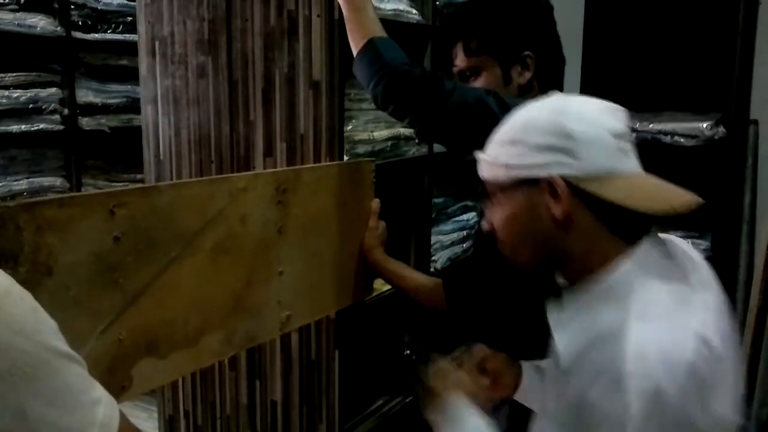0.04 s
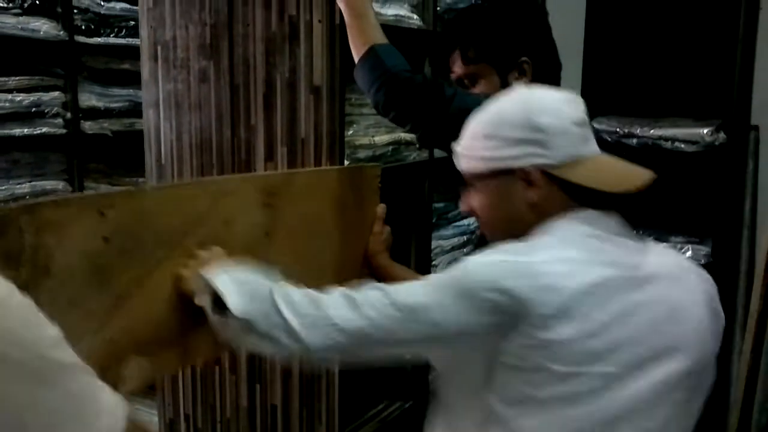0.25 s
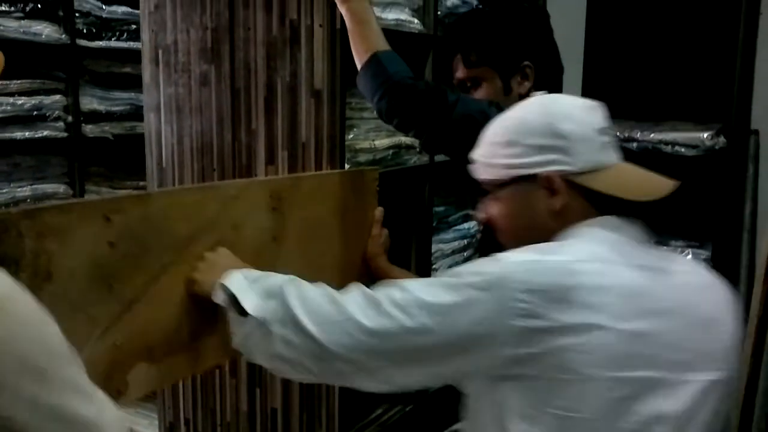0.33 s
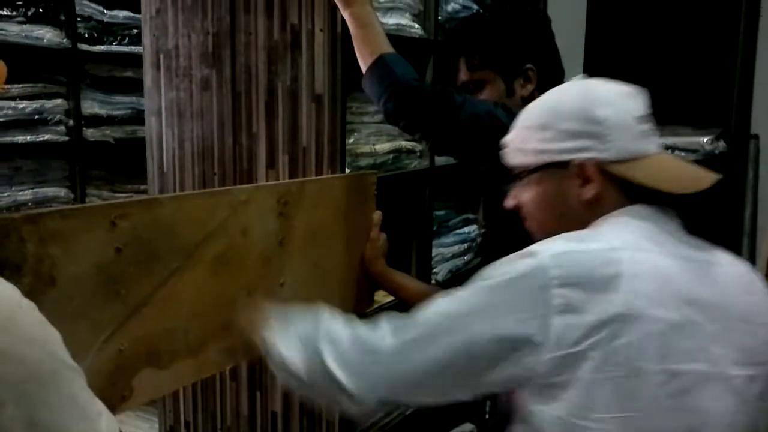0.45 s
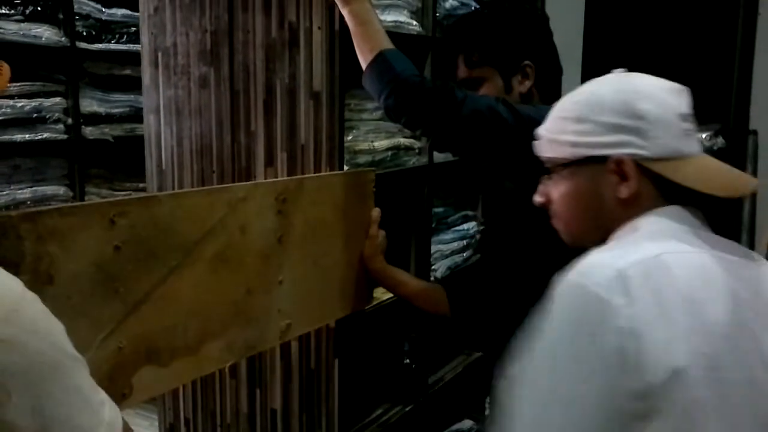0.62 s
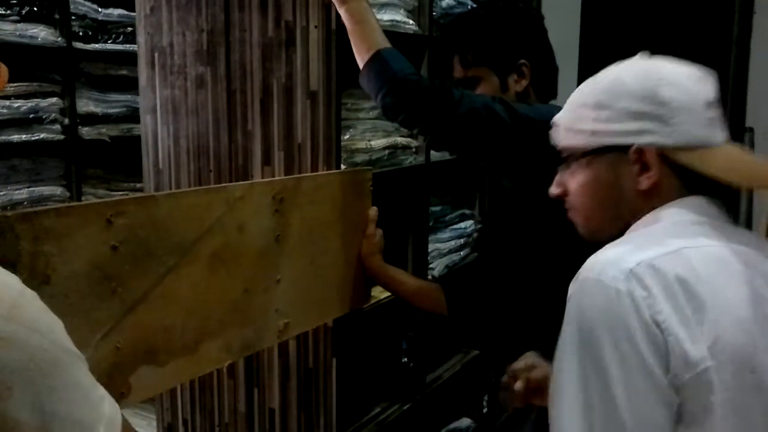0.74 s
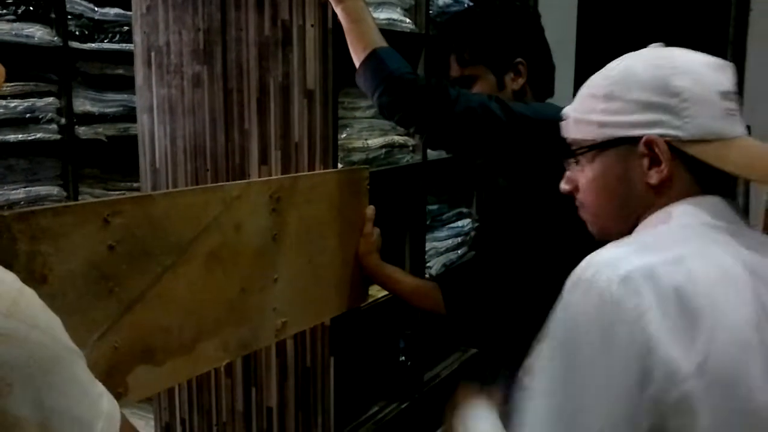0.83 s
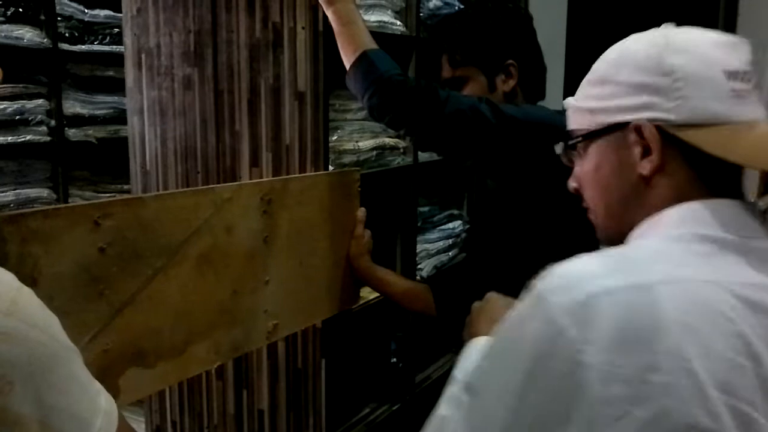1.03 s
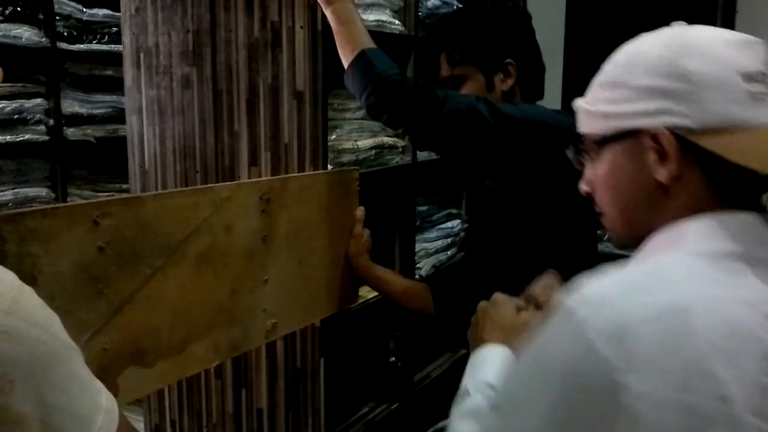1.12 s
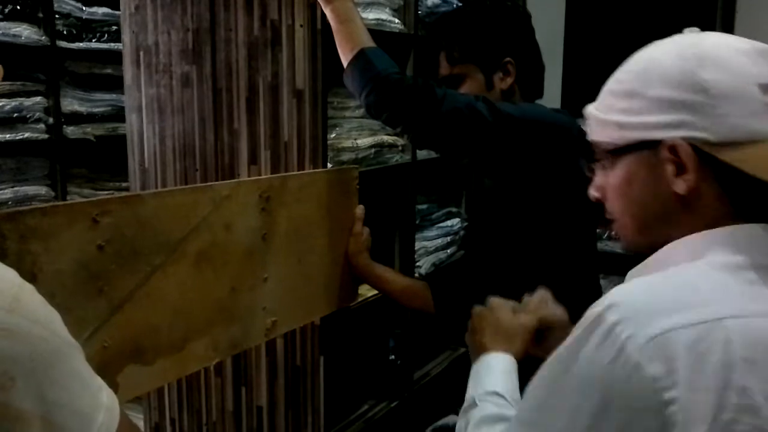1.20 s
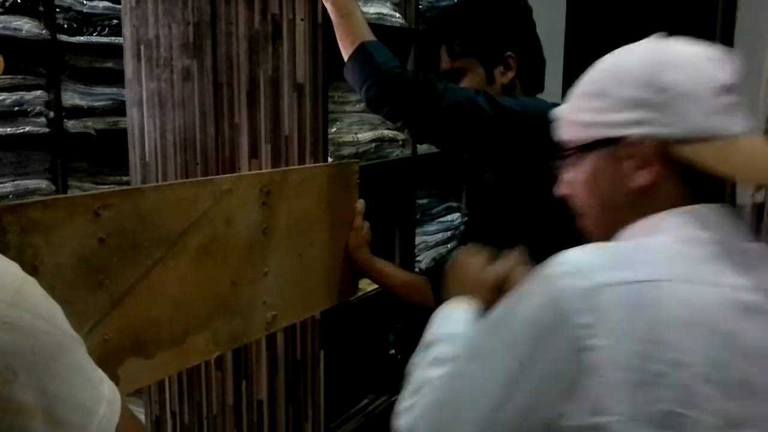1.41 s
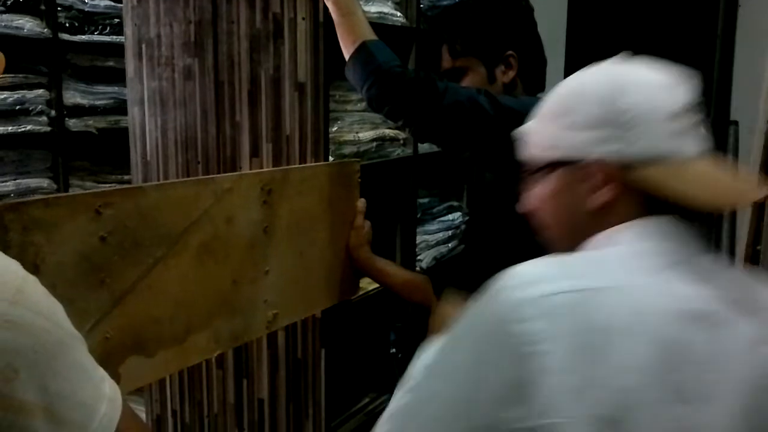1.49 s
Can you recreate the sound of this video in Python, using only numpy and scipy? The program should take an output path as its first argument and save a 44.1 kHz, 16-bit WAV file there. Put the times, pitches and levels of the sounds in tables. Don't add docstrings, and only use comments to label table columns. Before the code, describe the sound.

A single loud punch on a held wooden board, a sharp crack with a fast rattle and short woody ring, then quiet shoe scuffs, a squeak and shirt rustle in a small shop, heard close.

```python
import sys
import numpy as np
from scipy import signal
from scipy.fft import rfft, irfft
from scipy.io import wavfile
from scipy.ndimage import uniform_filter1d

SR = 44100
rng = np.random.default_rng(int(sys.argv[2]) if len(sys.argv) > 2 else 0)


def generate_wav(sig):
    pcm = np.round(np.clip(np.atleast_2d(sig).T, -1, 1) * 32767).astype(np.int16)
    wavfile.write(sys.argv[1], SR, pcm)


def invert_db(level):
    return 10 ** (np.asarray(level, dtype=float) / 20)


N = 68355


def evened(x):
    return x / np.sqrt(np.mean(x ** 2) + 1e-20)


def read(points, hz):
    f, value = np.transpose(points)
    return np.interp(np.log(hz + 1), np.log(f + 1), value)


def colour(x, points, skirt_db=-18):
    hz = np.fft.rfftfreq(len(x), 1 / SR) + 1
    octaves_below = np.maximum(np.log2(points[0][0] / hz), 0)
    octaves_above = np.maximum(np.log2(hz / points[-1][0]), 0)
    gain = invert_db(read(points, hz) + skirt_db * (octaves_below + octaves_above))
    return evened(irfft(rfft(x) * gain, len(x)))


def resonate(x, hz, width):
    turn = np.exp(2j * np.pi * hz * np.arange(len(x)) / SR)
    r = np.exp(-np.pi * width / SR)
    return 2 * (turn * signal.lfilter([1 - r], [1, -r], x / turn)).real


def band(x, hz, width):
    return evened(resonate(resonate(x, hz, width), hz, width))


def sine(hz, t):
    return np.sin(2 * np.pi * hz * t)


def add(mix, s, sound):
    part = mix[round(s * SR):][:len(sound)]
    part += sound[:len(part)]


def strokes(rows):
    edge_db, edge_shape = -12.5, 1.62
    t, power = np.arange(N) / SR, np.zeros(N)
    for peak, rise, fall, db in rows:
        u = np.where(t < peak, (peak - t) / rise, (t - peak) / fall)
        power += invert_db(db + edge_db * u ** edge_shape) ** 2
    return np.sqrt(power)


def grit():
    grain_db, flutter_db = 2.5, 1.5
    flutter = evened(uniform_filter1d(rng.standard_normal(N), size=300))
    unevenness = np.minimum(rng.exponential(1, N), 5)
    return rng.standard_normal(N) * invert_db(grain_db * unevenness + flutter_db * flutter)


SHEET_T = np.arange(SR // 3) / SR

# (t/s, level/dB, contact/ms, brightness/dB per octave, crack/dB)
BLOWS = [
    (0.2159, -5, 1.36, 1, 6),
    (.2225, -6.5, 0.8, 3, -3),
    (0.2295, -1.5, 0.78, -0.5, 0),
    (.2307, -4, 0.61, 7, -2.5),
    (0.2342, -6.5, 0.84, 0, 0),
    (0.2368, -3, 1.1, 0, 3),
    (0.2491, -8, 1.85, 1, -3.5),
    (.265, -15.5, 1.23, 6, 2),
]
FIST_S, FIST_CONTACT_MS = BLOWS[0][0], BLOWS[0][2]
# (f/Hz, level/dB, time to fall 60 dB/s)
SHEET = [(265.3, -8.5, 0.063), (319, -9, 0.098), (381.3, -12, 0.046), (587, -10.5, 0.05), (745, -8, 0.052),
         (907, -11, 0.044), (1050, -9.5, .07), (1281, -13, .05), (1870, -11.5, 0.04), (2190, -15, 0.014),
         (2582, -19, .02), (3190, -19, 0.015)]


def blows(out):
    direct_db, ring_db, recoil = -1.5, -10, 0.9
    crack_hz, crack_width_hz, crack_db, crack_t60 = 8595, 2500, -12.5, 0.0097
    most_cycles = 45
    t = SHEET_T
    fizz = band(rng.standard_normal(len(t)), crack_hz, crack_width_hz)
    for s, db, ms, tilt_db, blow_crack_db in BLOWS:
        onset = np.minimum(t * 1000 / ms, 1)
        push = np.sin(np.pi * onset[:200]) ** 2
        spring_back = recoil * np.roll(push, round(ms * SR / 1000))
        add(out, s, invert_db(db + direct_db) * (push - spring_back))

        ring = np.zeros(len(t))
        for hz, mode_db, t60 in SHEET:
            decay_db = -60 * t / min(t60, most_cycles / hz)
            ring += invert_db(mode_db + tilt_db * np.log2(hz / 1000) + decay_db) * sine(hz, t)
        add(out, s, invert_db(db + ring_db) * ring * onset)

        crack_level = invert_db(db + crack_db + blow_crack_db - 60 * t / crack_t60)
        add(out, s, crack_level * fizz * onset)
        fizz = np.roll(fizz, 999)


# (f/Hz, level/dB, time to fall 60 dB/s)
FLEX = [(77, -11.5, .14), (100, -14, 0.043), (133, -18.5, 0.049), (275, -13, 0.079)]


def flex(out):
    t = SHEET_T
    bend = sum(invert_db(db - 60 * t / t60) * sine(hz, t) for hz, db, t60 in FLEX)
    add(out, FIST_S + FIST_CONTACT_MS / 2000, -bend)


# (t/s, level/dB, f/Hz, time to fall 60 dB/s)
KNOCKS = [(.2163, -16, 5100, .012), (.2163, -12, 2150, .03), (.2163, -15.5, 2650, .02),
          (.217, -12.5, 8100, .01), (.2222, -8, 900, .04), (.2225, -13.5, 1045, .06),
          (.228, -10, 745, .045), (.2295, -13.5, 3560, .025), (.2295, -13, 590, .05),
          (.2335, -8.5, 385, .05), (.2485, -17, 320, .07), (.248, -24, 1750, .03), (.265, -24, 420, .05),
          (.279, -25, 1010, .05), (.281, -26.5, 770, .04), (.284, -24.5, 300, .07), (.286, -26, 62, .15),
          (.298, -29.5, 500, .07), (.298, -31.5, 2400, .03), (.308, -34, 330, .11), (.31, -34.5, 200, .08),
          (.325, -34, 55, .08)]


def knocks(out):
    t = SHEET_T
    for s, db, hz, t60 in KNOCKS:
        add(out, s, invert_db(db - 60 * t / t60) * sine(hz, t) * np.minimum(t * hz / 1.5, 1))


# (f/Hz, level/dB per Hz)
RATTLE = [(60, -23), (300, -14), (1040, -12.5), (2200, -9.5), (3500, -17.5), (5700, -24), (8000, -14.5),
          (12500, -34.5)]


def rattle(out):
    level_db, hold_s, t60 = -18, 0.029, 0.12
    lead_s, lead_db = 0.003, -22.5
    u = SHEET_T - lead_s
    lead_in = lead_db * (1 - u / lead_s) / 2
    fade = -60 * np.maximum(u - hold_s, 0) / t60
    shape_db = np.where(u < 0, lead_in, fade)
    add(out, FIST_S - lead_s, invert_db(level_db + shape_db) * colour(grit(), RATTLE)[:len(u)])


def sheet():
    out = np.zeros(N)
    blows(out)
    flex(out)
    knocks(out)
    rattle(out)
    return signal.sosfilt(signal.butter(8, 11500, fs=SR, output="sos"), out)


# (peak t/s, half length/s, level/dB, f/Hz, glide/Hz per s)
THUDS = [
    (0.388, 0.04, -43.5, 76.4, -2),
    (.78, .035, -38, 50, 99.5),
    (0.811, 0.038, -33, 71.4, 159),
    (0.851, 0.021, -44.5, 97, 0),
    (0.876, 0.013, -39, 64.9, 6.5),
]


def thuds():
    out = np.zeros(N)
    for s, length, db, hz, glide in THUDS:
        u = np.arange(-length, length, 1 / SR)
        swell = invert_db(db - 30 * (u / length) ** 2)
        add(out, s - length, swell * np.cos(2 * np.pi * (hz + glide * u / 2) * (u - .009)))
    return out


# (peak t/s, rise/s, fall/s, level/dB)
SCUFFS = [
    (.44, 0.094, 0.051, -46),
    (.49, 0.033, 0.021, -52),
    (.75, 0.025, 0.1, -47.5),
    (.812, 0.041, 0.084, -41),
    (.875, 0.018, 0.041, -45),
    (1.09, 0.031, 0.037, -53.5),
    (1.22, 0.063, 0.037, -46.5),
]
# (f/Hz, level/dB per Hz)
SCUFF = [(530, -73.5), (900, -53.5), (956, -27.5), (1170, -33), (1230, -44), (1880, -2.5), (3150, 0),
         (9530, -2.5), (16000, -28)]
# (peak t/s, rise/s, fall/s, level/dB)
SHUFFLES = [(.01, 0.089, 0.26, -71), (.17, 0.052, 0.24, -63), (.7, 0.015, 0.09, -65),
            (.955, 0.035, 0.036, -55.5), (1.04, 0.05, 0.19, -58), (1.135, 0.028, 0.21, -55),
            (1.275, 0.061, 0.013, -50.5), (1.35, 0.05, 0.043, -62.5), (1.465, 0.031, 0.048, -67),
            (1.52, 0.029, 0.037, -71.5)]
# (f/Hz, level/dB per Hz)
SHUFFLE = [(530, -58.5), (900, -20.5), (1280, -19.5), (1930, 2.5), (2730, 1.5), (3420, -18), (6000, -13),
           (7800, -54.5), (13200, -120)]
# (peak t/s, rise/s, fall/s, level/dB)
DRAGS = [(.36, 0.078, 0.11, -52), (.515, 0.046, 0.038, -58), (.585, 0.021, 0.04, -59.5),
         (.815, 0.036, 0.063, -73.5), (1.09, 0.062, 0.031, -58.5), (1.455, 0.0095, 0.069, -66)]
# (f/Hz, level/dB per Hz)
DRAG = [(88, -32.5), (150, -21), (263, 0.5), (1180, -6), (1510, -7.5), (1800, -2.5), (2340, -40),
        (3960, -120)]


def soles():
    kinds = [(SCUFFS, SCUFF), (SHUFFLES, SHUFFLE), (DRAGS, DRAG)]
    return sum(strokes(rows) * colour(grit(), tone) for rows, tone in kinds)


# (peak t/s, rise/s, fall/s, level/dB, f/Hz)
RUBS = [(0.806, 0.039, 0.046, -55.5, 167.5), (1.1, 0.035, 0.022, -66, 485), (1.085, 0.039, 0.043, -66, 926),
        (0.576, 0.018, 0.025, -61, 3700), (0.543, 0.0086, 0.042, -62, 1070),
        (0.794, 0.057, 0.051, -49, 3550), (.875, 0.015, 0.029, -43, 2980),
        (1.091, 0.094, 0.029, -58.5, 4920), (1.2, 0.043, 0.052, -60.5, 1440),
        (1.271, 0.036, 0.021, -52.5, 3100), (1.453, 0.0031, 0.028, -56, 1830),
        (1.468, .015, 0.046, -65, 1560)]


def rubs():
    slip, sharpness = grit(), 4.04
    out = np.zeros(N)
    for peak, rise, fall, db, hz in RUBS:
        out += strokes([(peak, rise, fall, db)]) * band(slip, hz, hz / sharpness)
    return out


# (peak t/s, rise/s, fall/s, level/dB)
SQUEAKS = [(.575, 0.031, 0.072, -54.5), (.62, 0.13, 0.027, -57.5)]
# (f/Hz, width/Hz, level/dB)
SQUEAK = [(1316, 303, -9), (2070, 375, 4), (3142, 395, -4), (3853, 900, -14)]


def squeaks():
    slip = grit()
    tone = sum(invert_db(db) * band(slip, hz, width) for hz, width, db in SQUEAK)
    return strokes(SQUEAKS) * evened(tone)


# (t/s, level/dB, f/Hz, time to fall 60 dB/s)
TICKS = [
    (1.037, -41, 9000, 0.0049),
    (1.0436, -37, 8480, 0.0035),
    (1.4505, -45, 2110, 0.011),
]


def ticks():
    out, t = np.zeros(N), np.arange(1500) / SR
    for s, db, hz, t60 in TICKS:
        add(out, s, invert_db(db - 60 * t / t60) * sine(hz, t))
    return out


# (peak t/s, rise/s, fall/s, level/dB)
RUSTLES = [(.16, 0.017, 0.085, -73.5), (.35, 0.1, 0.13, -45.5), (.57, 0.081, 0.049, -60),
           (.66, 0.04, 0.25, -69), (.95, 0.073, 0.21, -65.5), (1.06, 0.036, 0.17, -51.5),
           (1.168, 0.0046, 0.055, -37), (1.26, 0.09, 0.087, -51.5), (1.35, 0.062, 0.046, -59.5),
           (1.465, 0.019, 0.02, -63.5), (1.543, 0.017, 0.089, -44.5)]
# (f/Hz, level/dB per Hz)
RUSTLE = [(1760, -20), (3000, -17), (3780, -25.5), (5250, -15), (9460, 5), (13200, -19.5), (15700, -24.5),
          (16000, -39)]


def shirt():
    return strokes(RUSTLES) * colour(grit(), RUSTLE)


# (f/Hz, time to fall 60 dB/s)
SHOP = [(60, 0.43), (160, 0.27), (420, 0.066), (1100, 0.2), (2910, 0.22), (7680, 0.23)]


def shop(x):
    taps = np.zeros(SR // 2)
    at = np.arange(200, SR // 2 - 20, 20)
    taps[at + rng.integers(0, 20, len(at))] = rng.choice([-1., 1.], len(at))
    hz, t, z = signal.stft(taps, SR, nperseg=256)
    decay = invert_db(-60 * t / read(SHOP, hz)[:, None])
    tail = signal.istft(z * decay, SR, nperseg=256)[1]
    tail = signal.sosfilt(signal.butter(2, 109, "high", fs=SR, output="sos"), tail)
    return signal.fftconvolve(x, tail / np.linalg.norm(tail))[:N]


# (t/s, level/dB)
RUMBLE = [(0, -51), (.09, -42), (.14, -53), (0.18, -41), (.45, -57), (.5, -53.5), (.61, -48.5),
          (0.722, -54.5), (0.741, -63.5), (0.901, -56), (.97, -47.5), (1.119, -53), (1.166, -71),
          (1.2, -47.5), (1.28, -48), (1.304, -71), (1.34, -50), (1.55, -50.5)]


def machine():
    pitch_hz, wander_hz = 60.8, 2.43
    rough, width_hz = 0.3, 30
    drift = uniform_filter1d(rng.standard_normal(N), size=4000)
    drift = evened(uniform_filter1d(drift, size=4000))
    cycles = np.cumsum(pitch_hz + wander_hz * drift) / SR
    tone = np.sqrt(2) * np.sin(2 * np.pi * cycles)
    blur = band(rng.standard_normal(N), pitch_hz, width_hz)
    s, db = np.transpose(RUMBLE)
    return invert_db(np.interp(np.arange(N) / SR, s, db)) * (tone + rough * blur)


# (f/Hz, level/dB per Hz)
AIR = [(20, -3), (40, -1), (100, -16), (285, -27), (600, -38.5), (2300, -42.5), (4500, -51), (9500, -44.5)]


def air():
    return invert_db(-53.5) * colour(rng.standard_normal(N), AIR, skirt_db=-59.0)


def scene():
    near = sheet() + thuds() + soles() + rubs() + squeaks() + ticks() + shirt()
    echo = invert_db(-9.5) * shop(near)
    return (near + echo + machine() + air())[None]


def gate(x):
    from_hz, threshold_db, rise_db_per_khz, depth_db = 10000, -94, 1.5, -24.5
    hz, t, z = signal.stft(x, SR, nperseg=1024)
    hz = hz[:, None]
    power = uniform_filter1d(abs(z) ** 2, size=12, axis=1)
    band_db = 10 * np.log10(abs(power) + 1e-20)
    limit_db = threshold_db + rise_db_per_khz * (hz - from_hz) / 1000
    shut = np.clip((limit_db - band_db) / 2, 0, 1) * (hz > from_hz)
    return signal.istft(z * invert_db(depth_db * shut), SR, nperseg=1024)[1][:, :N]


def roll_off(x):
    return signal.sosfilt(signal.butter(12, 16480, fs=SR, output="sos"), x)


# (f/Hz, level/dB)
MIC = [(20, -5), (45, -1), (10200, -0.5), (11000, 1), (15000, 6)]


def record(dry):
    hz = np.fft.rfftfreq(2 * N, 1 / SR)
    x = irfft(rfft(dry, 2 * N) * invert_db(read(MIC, hz)), 2 * N)[:, :N]
    ceiling = invert_db(6.5)
    x = ceiling * np.tanh(x / ceiling)
    x = signal.oaconvolve(x, signal.firwin(255, 18000, fs=SR)[None], "same")
    return roll_off(gate(x))


dry = scene()
out = record(dry)
generate_wav(out)
```